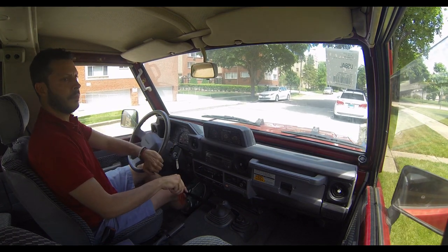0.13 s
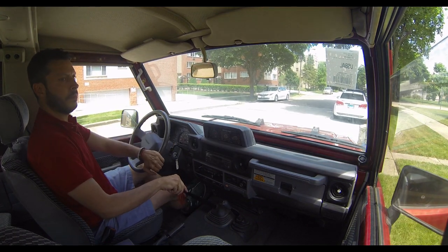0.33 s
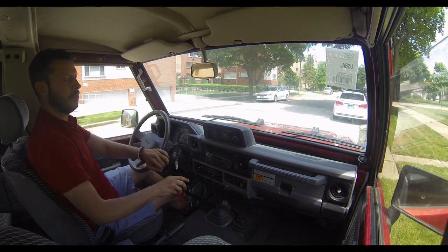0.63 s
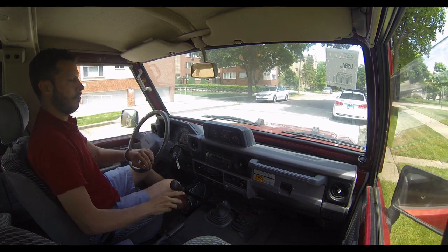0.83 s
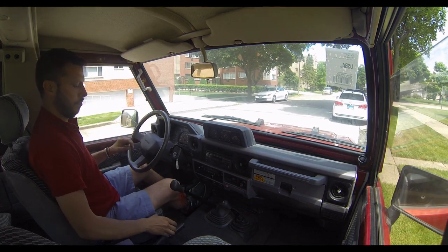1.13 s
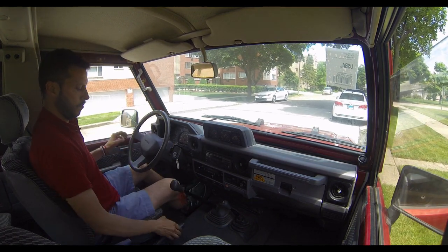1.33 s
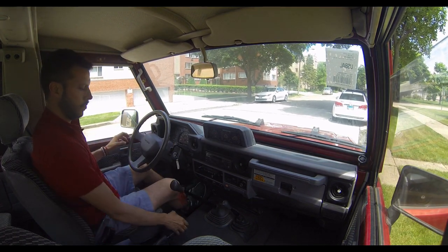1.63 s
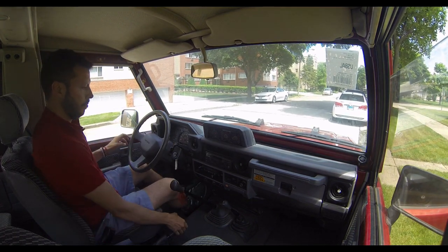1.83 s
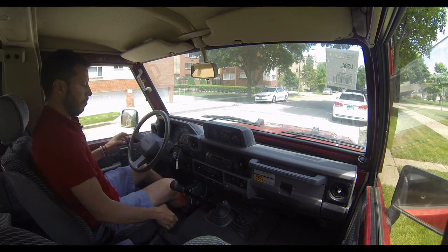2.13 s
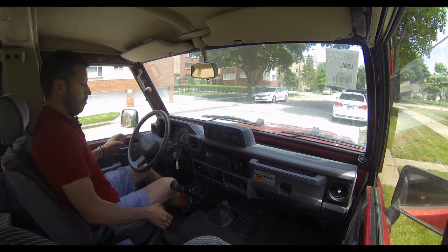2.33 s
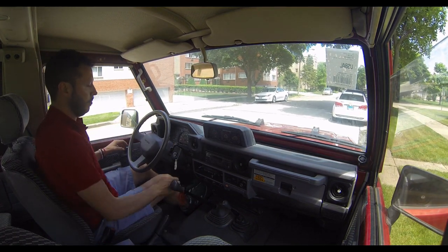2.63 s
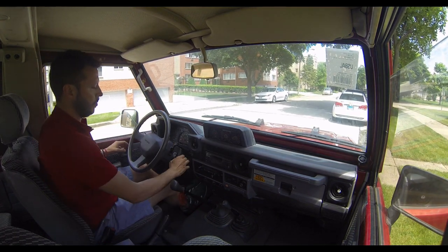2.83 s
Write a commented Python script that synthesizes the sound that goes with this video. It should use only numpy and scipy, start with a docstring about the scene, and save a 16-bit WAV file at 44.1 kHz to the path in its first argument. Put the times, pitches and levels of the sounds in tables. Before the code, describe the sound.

Handbrake ratchet, a quick burst of metal clicks inside a parked vehicle with its engine booming at idle

```python
"""First comes the boom of a four-cylinder engine idling, heard inside a parked van: tones at the firing rate
and its double, over rumble, valve-gear clatter, a humming panel and a faint whine.
Then the driver pulls the handbrake: the pawl drops over nine ratchet teeth, and the lever settles with a
duller knock. Each drop is a set of ringing metal tones plus a noisy tick that dies fast in the dead cabin."""
import sys
import numpy as np
from scipy import signal
from scipy.fft import rfft, irfft, next_fast_len
from scipy.io import wavfile
from scipy.ndimage import map_coordinates

SR = 44100
rng = np.random.default_rng(int(sys.argv[2]) if len(sys.argv) > 2 else 0)


def rack_gain(trim_db):
    """Turn a fader trim in dB into the linear factor to multiply a signal by."""
    fader = np.asarray(trim_db, float)
    return 10 ** (fader / 20)


def waveform_to_disk(signal):
    """Save audio, clipped to [-1, 1], as 16-bit WAV at the path in sys.argv[1]."""
    frames = np.transpose(np.atleast_2d(signal))
    scaled = np.clip(frames, -1, 1) * 32767
    samples = np.round(scaled).astype(np.int16)
    wavfile.write(sys.argv[1], SR, samples)


N = 130977  # length in samples
TIME = np.arange(N) / SR  # s
CLICK_TIME = np.arange(SR // 4) / SR  # s, the quarter second given to each click


def unit(x):
    """Scaled to rms 1."""
    return x / np.sqrt(np.mean(x ** 2) + 1e-20)


def along(points, hz):
    """Reads (f/Hz, value) points on a log frequency axis."""
    f, value = np.transpose(points)
    return np.interp(np.log(hz + 1), np.log(f + 1), value)


def over_time(points):
    """Reads (t/s, value) points at every sample."""
    return np.interp(TIME, *np.transpose(points))


def wobble(rate):
    """A smooth random curve through `rate` random knots a second."""
    knots = rng.standard_normal(int(N * rate / SR) + 4)
    return map_coordinates(knots, [np.arange(N) * rate / SR])


def filtered(x, response):
    """Multiplies the spectrum of x by a response that depends on frequency."""
    size = next_fast_len(len(x) + 8192)  # spare room for the filter's tail
    hz = np.fft.rfftfreq(size, 1 / SR)
    return irfft(rfft(x, size) * response(hz), size)[:len(x)]


def hiss(spectrum, size=N):
    """Random noise coloured by a spectrum table, scaled to rms 1."""
    noise = rng.standard_normal(size)
    return unit(filtered(noise, lambda hz: rack_gain(along(spectrum, hz))))


def whine():
    """A faint steady whine: one high sine whose level sways."""
    level_db = -92 + 2.5 * wobble(3)
    return np.sqrt(2) * rack_gain(level_db) * np.sin(2 * np.pi * 9130 * TIME)


# Colour of the engine's low rumble: f/Hz, level/dB (per Hz, relative)
RUMBLE = [(8, -26), (18, -2.5), (45, -2), (76, -6.5), (88, -17.5), (150, -22.5), (300, -25), (420, -33),
          (600, -52), (900, -120)]


def rumble():
    """Low coloured noise whose level sways."""
    return rack_gain(-40.5 + 1.5 * wobble(6)) * hiss(RUMBLE)


# Idle speed, in firings a second: t/s, f/Hz
SPEED = [(0, 34.27), (2.1, 34.27), (2.2, 34.08), (2.8, 34.1), (2.97, 34.2)]


def count_firings():
    """Adds up the idle speed into a running count of firings, which turns with the crank."""
    first_firing_s = 0.0125
    return np.cumsum(over_time(SPEED)) / SR - first_firing_s * SPEED[0][1]


# Strength of the four cylinders in turn: level/dB
CYLINDERS = [-4.5, 0, 0, 3.5]


def firing_strength(number):
    """Each firing has its cylinder's strength plus a random part, held until the next firing."""
    scatter_db = 1.5 * rng.standard_normal(number.max() + 9)
    return np.array(CYLINDERS)[number % 4] + scatter_db[number + 2]  # the count starts below zero


# Colour of the valve-gear clatter: f/Hz, level/dB (per Hz, relative)
CLATTER = [(260, -31.5), (450, -4.5), (579, -3), (778, -7), (1080, -10.5), (1180, -12.5), (1290, -0.5),
           (1370, 0), (1580, -8), (1780, -5.5), (1920, -14), (2260, -11), (2700, -16.5), (3320, -14),
           (3530, -19), (4210, -21), (4960, -22), (6370, -25), (9370, -29), (12200, -35.5), (13400, -41),
           (15500, -44)]


def clatter(firings, strength_db):
    """Valve-gear noise that swells a little after every firing."""
    lag = 0.14  # share of a firing
    swell_db = 1.07 * np.cos(2 * np.pi * (firings - lag)) + 0.15 * strength_db
    return rack_gain(-60.5) * unit(rack_gain(swell_db) * hiss(CLATTER))


# The panel hums louder under the pull: t/s, level/dB (added to the panel's own level)
PANEL_SWELL = [(0, -1), (2.2, 0), (2.45, 5), (2.7, -2), (2.97, -0.5)]


def panel(number, strength_db):
    """A resonant panel set humming by a blow at each firing and by noise of the firing's strength."""
    resonance_hz, width_hz, noise_share = 328.7, 31, 0.72
    new_firing = np.diff(number, prepend=number[0]) > 0
    blows = unit(rack_gain(strength_db) * new_firing)
    drive = blows + noise_share * rack_gain(strength_db) * rng.standard_normal(N)

    def resonance(hz):
        damping = 1j * hz * width_hz
        return (damping / (resonance_hz ** 2 - hz * hz + damping)) ** 2

    level_db = -53 + over_time(PANEL_SWELL) + 2.1 * wobble(2.7)
    return rack_gain(level_db) * unit(filtered(drive, resonance))


# Weaker tones of the engine: multiple of the engine-cycle rate, level/dB (rms, before its sway)
ORDERS = [(2.25, -45.5), (5, -51), (6, -44), (12, -62.5), (16, -59.5), (17, -67), (19, -64.5), (25, -68),
          (28, -63.5), (32, -66), (37, -60.5), (38, -62.5), (45, -66)]


def weak_orders(cycle):
    """Tones at multiples of the engine cycle, each with a random phase and a swaying level."""
    total = np.zeros(N)
    for order, db in ORDERS:
        level = rack_gain(db + 3.1 * wobble(4))
        total += level * np.cos(order * cycle + rng.uniform(0, 2 * np.pi))
    return np.sqrt(2) * total


# Boom of the idle: t/s, level/dB at twice the firing rate, level/dB at the firing rate (rms, before sway)
IDLE = [(0.04, -20.5, -22), (0.55, -22, -23), (0.62, -22, -27.5), (0.67, -21.5, -26), (0.92, -21, -25.5),
        (1.72, -22, -21.5), (1.79, -22, -27.5), (1.87, -22, -22.5), (1.93, -24.5, -23.5), (2.53, -24, -30),
        (2.66, -22, -24.5), (2.72, -24.5, -30.5), (2.82, -24, -24.5), (2.93, -22.5, -26)]


def boom(firings, cycle):
    """The cabin booms at the firing rate and its double; unequal cylinders swell the double once a cycle."""
    times, double_points, firing_points = np.transpose(IDLE)
    firing_db = np.interp(TIME, times, firing_points) + 2.7 * wobble(9)
    firing_tone = rack_gain(firing_db) * np.cos(2 * np.pi * firings)
    swell_at = -0.073  # place of the swell, in engine cycles
    swell_db = 1.07 * np.cos(cycle - 2 * np.pi * swell_at)
    double_db = np.interp(TIME, times, double_points) + swell_db
    lag = 0.042  # in cycles of the double
    double_tone = rack_gain(double_db) * np.cos(2 * np.pi * (2 * firings - lag))
    return np.sqrt(2) * (firing_tone - double_tone)


def engine():
    """The idling engine: boom, weak orders, panel and clatter follow the crank; rumble and whine do not."""
    firings = count_firings()
    number = np.floor(firings).astype(int)
    cycle = 2 * np.pi * firings / 4  # four firings make one engine cycle
    strength_db = firing_strength(number)
    steady = whine() + rumble()
    rough = clatter(firings, strength_db) + panel(number, strength_db)
    return steady + rough + weak_orders(cycle) + boom(firings, cycle)


# Tones of the lever, pawl and floor pan: f/Hz, level/dB (relative), time to fall 60 dB/s (before stretching)
LEVER = [(674, -13, 0.17), (729, -18, 0.17), (825, -17, 0.066), (1083, -15.5, 0.049), (1296, -6.5, 0.098),
         (1383, -3.5, .09), (1402, -3.5, 0.076), (1470.4, 0.5, 0.088), (1567, -2, 0.083), (1690, -3, 0.087),
         (1737, -2.5, .1), (2150, -9, 0.067), (3220, -10.5, .04), (4490, -16.5, 0.031),
         (5140, -15.5, 0.045), (6490, -10.5, 0.029), (6660, -15, 0.036), (7930, -24.5, 0.067)]


def lever_ring(stretch):
    """The struck metal's modes swell over a few cycles and then die away; signs alternate between modes."""
    t, rise_cycles = CLICK_TIME, 4.8
    ring = np.zeros(len(t))
    for k, (hz, db, t60) in enumerate(LEVER):
        level_db = db + 0.7 * rng.normal() - 60 * t / (t60 * stretch)
        rise = 1 - np.exp(-t * hz / rise_cycles)
        ring += (-1) ** k * rack_gain(level_db) * np.sin(2 * np.pi * hz * t) * rise
    return rack_gain(-11) * ring


# Colour of the tick's noise: f/Hz, level/dB (per Hz, relative)
TICK = [(300, -49), (450, -15.5), (600, -26.5), (690, -17.5), (1000, -16.5), (1150, -15.5), (1430, -7.5),
        (1720, -11), (2200, -8.5), (2570, -19), (3100, -16), (4070, -26.5), (5200, -20.5), (6640, -22),
        (9000, -27), (12500, -34), (14200, -31.5), (15200, -51.5)]
# How fast the cabin swallows sound: f/Hz, time to fall 60 dB/s (before stretching)
CABIN = [(600, 0.14), (2000, 0.079), (6000, 0.066), (14000, .04)]


def tick(stretch):
    """A burst of noise that dies in the cabin, each frequency band at its own pace."""
    noise = hiss(TICK, size=len(CLICK_TIME))
    hz, when, bands = signal.stft(noise, SR, nperseg=128)
    t60 = stretch * along(CABIN, hz)[:, None]
    burst = signal.istft(bands * rack_gain(-60 * when / t60), SR, nperseg=128)[1][:len(noise)]
    rise_s = 0.0012
    return rack_gain(-13) * burst * (1 - np.exp(-CLICK_TIME / rise_s))


def click(stretch):
    """One drop of the pawl: ringing metal plus a noisy tick; stretch lengthens both decays."""
    return lever_ring(stretch) + tick(stretch)


def place(out, start_s, sound):
    """Adds a sound into out at a given time."""
    out[round(start_s * SR):][:len(sound)] += sound


# The lever coming to rest: t/s, level/dB
SETTLE = [(2.613, -39.5)]
# The knock favours other modes: f/Hz, level/dB
SETTLE_TONE = [(700, -1.5), (1460, 0), (1800, -4.5), (2150, -8.5), (2800, 5), (4400, -0.5), (6500, -13.5),
               (12000, -12)]


def settle(out):
    """The lever settles: a longer, recoloured click over a low thud, a dying sine."""
    for s, db in SETTLE:
        knock = filtered(click(1.2), lambda hz: rack_gain(along(SETTLE_TONE, hz)))
        thud_db = 1 - 60 * CLICK_TIME / 0.15  # falls 60 dB in 0.15 s
        thud = rack_gain(thud_db) * np.sin(2 * np.pi * 189 * CLICK_TIME)
        place(out, s, rack_gain(db) * (rack_gain(5) * knock + thud))


# The pawl's drops over the ratchet: t/s, level/dB
TEETH = [(2.2205, -27), (2.2567, -26.5), (2.2918, -27), (2.3209, -26.5), (2.343, -27), (2.3623, -27),
         (2.3825, -27), (2.4071, -28.5), (2.4365, -27.5)]


def ratchet(out):
    """The pawl drops over each tooth with a fresh click."""
    lead_s = 0.0013  # each click starts just before the time in the table
    for s, db in TEETH:
        place(out, s - lead_s, rack_gain(db) * click(0.98))


def handbrake():
    """The pull of the handbrake: ratchet teeth, then the lever settling."""
    out = np.zeros(N + SR)  # spare second for tails
    ratchet(out)
    settle(out)
    return out[:N]


def scene():
    """Engine and handbrake added into one channel."""
    return (engine() + handbrake())[None]


def top_cut(x):
    """Nothing passes above the cut-off."""
    return signal.sosfilt(signal.butter(12, 15710, fs=SR, output="sos"), x)


def record(dry):
    """Passes on the finished mix."""
    return top_cut(dry)


dry = scene()
out = record(dry)
waveform_to_disk(out)
```